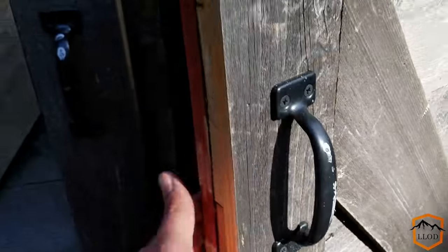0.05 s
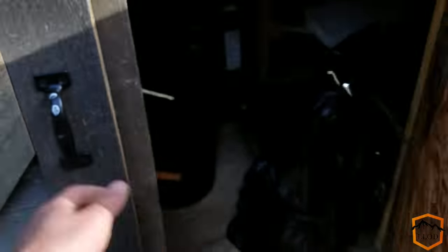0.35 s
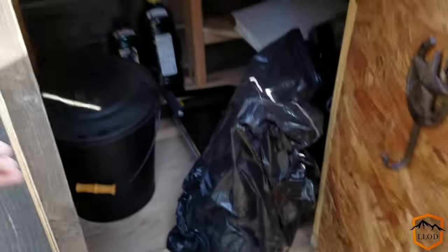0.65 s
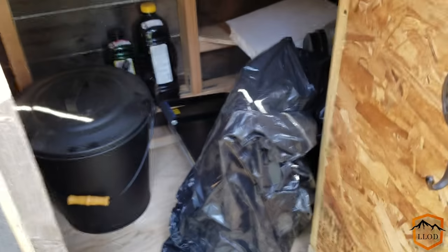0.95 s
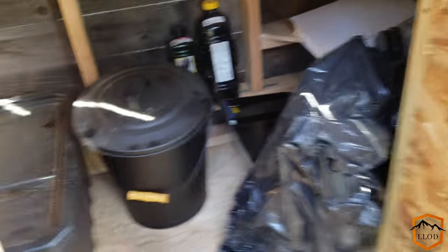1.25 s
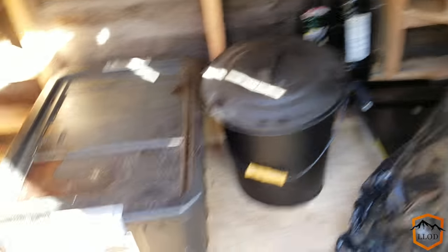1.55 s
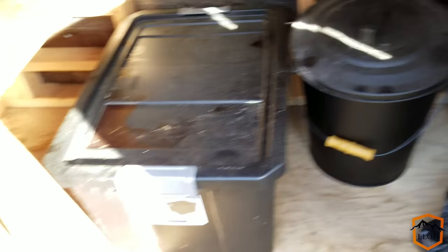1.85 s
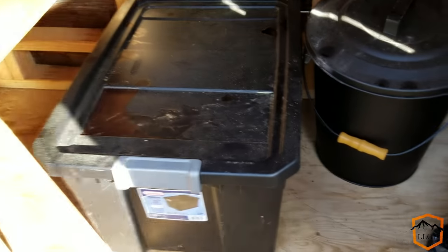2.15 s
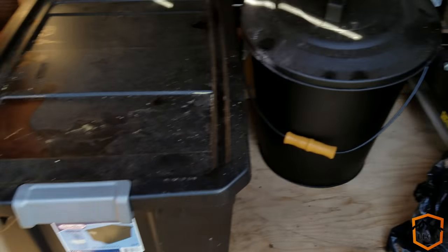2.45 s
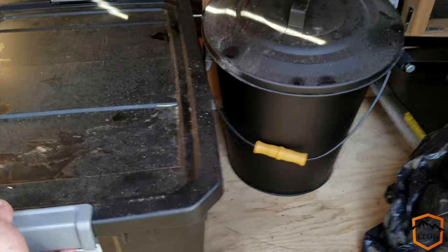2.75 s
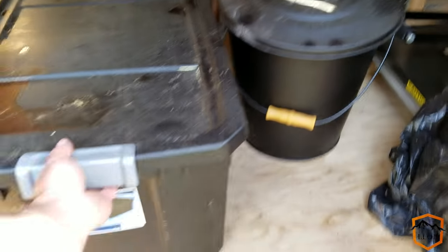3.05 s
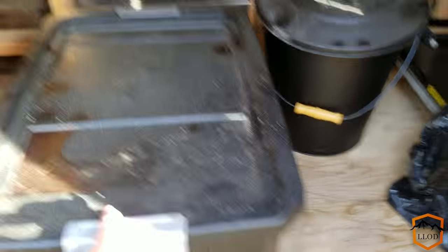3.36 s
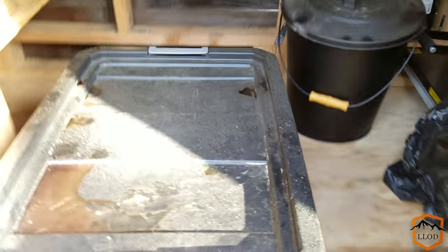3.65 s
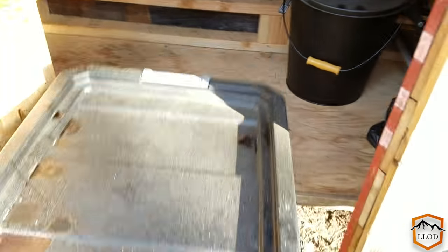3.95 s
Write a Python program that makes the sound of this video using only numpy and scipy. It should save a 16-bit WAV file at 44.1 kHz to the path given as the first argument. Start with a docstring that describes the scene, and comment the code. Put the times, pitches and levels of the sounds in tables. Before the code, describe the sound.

A wooden door squeals and creaks open, then a plastic tub thumps and drags.

```python
"""A wooden shed door swings open on a dry hinge, close to a single microphone. The hinge sticks and
slips: it squeals high, stops, then slides down into a rough creak while the boards rub and rattle.
Inside the small shed come heavy thumps on the hollow floor and a few knocks, then a plastic tub is
dragged over the gritty plywood, droning and scraping, and bumps to rest.
The board walls give short reflections, and faint outdoor air lies behind it all."""
import sys
import numpy as np
from scipy import signal
from scipy.fft import rfft, irfft
from scipy.io import wavfile

SR = 44100
rng = np.random.default_rng(int(sys.argv[2]) if len(sys.argv) > 2 else 0)


def output_pcm(signal):
    """Save a mono or channel-first signal as 16-bit PCM at the path in sys.argv[1].

    Samples are clipped to [-1, 1] before scaling.
    """
    pcm = np.clip(np.atleast_2d(signal).T, -1, 1) * 32767
    wavfile.write(sys.argv[1], SR, np.round(pcm).astype(np.int16))


N = 176400
TIME = np.arange(N) / SR
CUTOFF_HZ = 15750

# Spectrum of the air outside: frequency_hz, gain_db
AIR_SPECTRUM = [(40, -22), (260, -3), (650, 0), (1000, -8), (3000, -24), (12000, -35)]

# Small bright ticks: start_s, level_db
TICK_HITS = [(0.473, -55.5), (2.721, -47)]
# Knocks and scuffs on wood and plastic: start_s, bass_db, middle_db, presence_db, treble_db, rise_s, t60_s
KNOCK_HITS = [(0.053, -28, -26, -61, -51, 0.00015, 0.048), (0.151, -45, -25, -37, -40.5, 0.0074, 0.096),
              (0.195, -46.5, -33, -38, -52, 0.0015, 0.087), (0.472, -75, -40.5, -77, -64, 0.0012, 0.14),
              (.499, -66, -31.5, -72, -70, 0.00094, 0.039), (.621, -41, -21.5, -55, -60, 0.00093, 0.0091),
              (.809, -62, -39, -48, -38, 0.00068, 0.033), (.873, -54, -20, -38, -37, 0.00033, 0.062),
              (0.918, -48, -22, -28, -28.5, 0.0012, 0.063), (.936, -32, -24.5, -60, -60, 0.00096, 0.16),
              (1.025, -33.5, -24, -28, -36.5, 0.001, 0.093), (1.073, -41, -22, -40, -34, 0.00037, 0.042),
              (1.505, -26, -15.5, -25, -27, 0.0023, 0.057), (1.791, -46, -31.5, -33, -47, 0.0071, 0.26),
              (1.939, -42, -26, -51, -48, 0.00404, 0.073), (2.258, -31, -17.5, -29, -33, 0.011, 0.27),
              (2.522, -68, -26, -19.5, -28, 0.00038, 0.011), (2.626, -12, -12.5, -20.5, -31, 0.0007, 0.093),
              (2.755, -23.5, -18.5, -34, -46.5, 0.00093, 0.28),
              (2.805, -24.5, -20.5, -30, -52, 0.0079, 0.11),
              (2.927, -26, -26.5, -39.5, -48.5, 0.0015, 0.19)]
# Edges of those four bands: frequency_hz
KNOCK_EDGES_HZ = [110, 330, 1200, 3500, 12000]
# Thumps, given for the floor's lowest mode: start_s, level_db, pitch_hz, t60_s
THUMP_HITS = [(2.015, -15, 292, 0.12), (2.455, -30, 79, 0.14), (2.642, -2.5, 177, 0.086),
              (2.676, -8, 154.6, 0.14), (2.882, -21.5, 175, 0.14), (3.956, -4.5, 279.2, 0.45)]
# Modes of the hollow floor: pitch_ratio, gain_db
FLOOR_RESONANCES = [(1, 0), (1.52, -7), (2.3, -16)]

# The tub is shifted slightly, then dragged: time_s, drone_db, scrape_db, grit_db
DRAG_LEVELS = [(2.64, -59, -33.5, -53), (3.022, -44, -53, -60), (3.036, -21.5, -20, -38),
               (3.1, -8, -15, -36), (3.21, -15.5, -14.5, -39), (3.36, -17.5, -13, -37),
               (3.712, -24.5, -14.5, -36.5), (3.728, -48, -17, -21), (3.76, -19, -13, -32.5),
               (3.86, -29.5, -18.5, -30), (3.945, -16.5, -18, -25.5), (3.99, -11, -36.5, -59)]
# Ringing of the tub's walls: pitch_hz, gain_db, t60_s
TUB_RESONANCES = [(242, 3.5, .12), (381, 4.5, 0.14), (513, 0.5, 0.11), (879, -5, 0.16)]
# Spectra of the tub's drone, its scrape and the grit under it: frequency_hz, gain_db
DRONE_SPECTRUM = [(55, -20.5), (110, -7.5), (165, -1.5), (260, 3.5), (450, -0.5)]
SCRAPE_SPECTRUM = [(220, -23), (320, -3.5), (1000, -2.5), (1400, -6), (2000, -14), (2900, -20)]
GRIT_SPECTRUM = [(2900, -0.5), (4200, 1), (6000, -7.5), (8300, -14.5), (10700, -38.5), (13000, -24.5),
                 (15500, -41)]
# A close reflection of the grit, later as the tub moves away from the microphone: time_s, delay_s
GRIT_REFLECTION = [(3.1, .0002), (3.65, .0003)]

# Rubbing of the door boards, and the panel's boom while the hinge binds hardest: time_s, level_db
RUB_LEVELS = [(.77, -54.5), (.86, -35.5), (1.03, -35), (1.2, -24.5), (1.29, -19), (1.62, -23), (1.68, -31),
              (1.73, -49), (1.78, -46.5), (1.82, -26), (1.91, -60.5), (2.04, -26.5), (2.14, -43.5),
              (2.33, -34.5), (2.62, -42.5)]
BOOM_LEVELS = [(1.23, -40), (1.29, -18.5), (1.4, -37), (1.55, -38)]
# Spectrum of the rubbing: frequency_hz, gain_db
RUB_SPECTRUM = [(50, -14), (150, -8), (235, -3), (420, 0), (800, -4.5), (1500, -9), (4000, -22.5),
                (6000, -24.5)]
# Ringing of the door's planks and of the hinge leaf: pitch_hz, gain_db, t60_s
PLANK_RESONANCES = [(491, -6.5, 0.083), (599, 3.5, 0.2), (1080, 1, 0.053)]
LEAF_RESONANCES = [(4760, 1, .09), (5500, -1, .2)]

# The hinge's pin hiss, first whistle, squeal, creak and singing leaf: time_s, level_db
PIN_LEVELS = [(.5, -71), (.55, -54.5), (.7, -47.5), (.735, -72), (.8, -61), (.87, -42), (.99, -52),
              (1.5, -35.5), (1.66, -41), (1.73, -68), (1.78, -65), (1.83, -38.5), (2.32, -38), (2.6, -90)]
WHISTLE_LEVELS = [(0, -36.5), (.018, -55.5), (.08, -47.5), (.14, -43.5), (.155, -68)]
SQUEAL_LEVELS = [(1.165, -50), (1.18, -35.5), (1.24, -44), (1.29, -33), (1.37, -28), (1.42, -31),
                 (1.46, -25), (1.58, -21.5), (1.685, -29), (1.705, -54)]
CREAK_LEVELS = [(1.81, -44), (1.83, -25), (1.9, -33.5), (2.03, -35.5), (2.12, -38.5), (2.33, -38.5),
                (2.42, -43), (2.57, -49), (2.61, -73)]
SING_LEVELS = [(2.45, -40), (2.57, -46.5), (2.675, -46)]
# Spectra of the pin's hiss and of the squeal's and creak's partials: frequency_hz, gain_db
PIN_SPECTRUM = [(3000, -4.5), (5000, -6.5), (7000, 8), (9500, -10.5), (12500, -11.5), (15500, -16)]
SQUEAL_SPECTRUM = [(4700, -8.5), (6500, 8), (9800, -9.5), (13000, 1.5), (15000, -22)]
CREAK_SPECTRUM = [(1100, 5.5), (2400, -2.5), (3600, -5.5), (5000, -0.5), (7000, -6), (11500, -11),
                  (13800, -8.5), (15500, -22)]
# How often the hinge slips in the squeal and the creak: time_s, pitch_hz
SQUEAL_SLIP_RATE = [(1.18, 4500), (1.2, 5080), (1.21, 4250), (1.222, 5400), (1.24, 5400), (1.244, 6370),
                    (1.295, 6370), (1.358, 6950), (1.372, 6500), (1.42, 6150), (1.456, 5010), (1.5, 4990),
                    (1.556, 4700), (1.675, 4950), (1.695, 5650)]
CREAK_SLIP_RATE = [(1.825, 3780), (1.875, 3220), (1.895, 2840), (1.95, 2430), (1.967, 2370), (1.97, 1860),
                   (2.03, 1340), (2.1, 1210), (2.3, 1245), (2.395, 1275), (2.46, 1170), (2.52, 1110),
                   (2.59, 1060)]
# Unsteadiness of that slipping: time_s, share_of_slip_rate
SQUEAL_JITTER = [(1.235, .04), (1.25, .004), (1.32, .011), (1.405, .01), (1.43, .05), (1.452, .05),
                 (1.46, .003), (1.56, .007)]
CREAK_JITTER = [(1.94, .009), (2.02, .025), (2.18, .014), (2.32, .022), (2.42, .013)]


def from_db(db):
    """Decibels to gain."""
    return 10 ** (np.asarray(db) / 20)


def rms_one(x):
    """Scale to unit rms."""
    return x / np.sqrt(np.mean(x ** 2) + 1e-20)


def curve(rows, column=1):
    """Join a table's rows by straight lines in time."""
    rows = np.array(rows)
    return np.interp(TIME, rows[:, 0], rows[:, column])


def envelope(rows, column=1):
    """Gain from a dB column, fading fast outside its span."""
    outside_s = np.maximum(rows[0][0] - TIME, 0) + np.maximum(TIME - rows[-1][0], 0)
    return from_db(curve(rows, column) - np.minimum(800 * outside_s, 100))


def gain_at(spectrum, hz):
    """Gain of a spectrum, falling 24 dB an octave beyond its ends."""
    points_hz, db = np.transpose(spectrum)
    octaves_out = np.maximum(0, np.log2(points_hz[0] / hz)) + np.maximum(0, np.log2(hz / points_hz[-1]))
    return from_db(np.interp(np.log(hz), np.log(points_hz), db) - 24 * octaves_out)


def coloured(x, spectrum):
    """Give an excitation a spectrum, at unit rms."""
    hz = np.arange(1, N + 2) * SR / (2 * N)
    return rms_one(irfft(rfft(x, 2 * N) * gain_at(spectrum, hz))[:N])


def band(x, low_hz, high_hz):
    """Causal band-pass."""
    return signal.sosfilt(signal.butter(3, [low_hz, high_hz], "band", fs=SR, output="sos"), x)


def lowpass(x, hz):
    """Gentle treble roll-off."""
    return signal.sosfilt(signal.butter(2, hz, fs=SR, output="sos"), x)


def ring(x, hz, t60_s):
    """One resonance, with gain 1 at its top."""
    r = from_db(-60 / (t60_s * SR))
    poles = [1, -2 * r * np.cos(2 * np.pi * hz / SR), r * r]
    return signal.lfilter(np.array([1, 0, -1]) * (1 - r * r) / 2, poles, x)


def body(x, modes):
    """A body passes the vibration on and rings at its modes."""
    return x + sum(from_db(db) * ring(x, hz, t60_s) for hz, db, t60_s in modes)


def drift(rate_hz):
    """Smooth random wander at unit rms."""
    r = np.exp(-2 * np.pi * rate_hz / SR)
    return rms_one(signal.lfilter([1], [1, -2 * r, r * r], rng.standard_normal(N + SR))[SR:])


def slips(per_s, spread_db):
    """Random tiny slips of uneven size."""
    sizes = from_db(spread_db * np.minimum(rng.exponential(1, N), 4)) * rng.choice([-1, 1], N)
    return sizes * (rng.random(N) < per_s / SR)


def shed(x, room_db, low_t60_s=.3, treble_t60_s=.09):
    """Dense reflections off the board walls reach the microphone from 3 ms on; the treble dies first."""
    t = TIME[:SR // 2]
    noise = rng.standard_normal(len(t))
    low = lowpass(noise, 2360)
    tail = low * from_db(-60 * t / low_t60_s) + (noise - low) * from_db(-60 * t / treble_t60_s)
    tail *= t > .003
    return x + from_db(room_db) * signal.fftconvolve(x, tail / np.linalg.norm(tail))[:N]


def outdoor_air():
    """Faint, steady air beyond the shed."""
    return from_db(-52.5) * coloured(rng.standard_normal(N), AIR_SPECTRUM)


def ticks(t60_s=.18):
    """Light, hard contacts leave a short sizzle high in the treble."""
    shape = sum((TIME > s) * from_db(db - 60 * np.maximum(TIME - s, 0) / t60_s) for s, db in TICK_HITS)
    return shape * rms_one(band(rng.standard_normal(N), 10600, 14300))


def knocks(crack=4.4, t60_stretch=(1.94, 1, 1, 1)):
    """Each knock is a crack followed by a crowd of short-lived panel modes; the bass rings longest."""
    out, t = np.zeros(N + SR), TIME[:SR // 2]
    for start_s, *levels_db, rise_s, t60_s in KNOCK_HITS:
        start = int(start_s * SR)
        for db, low_hz, high_hz, stretch in zip(levels_db, KNOCK_EDGES_HZ, KNOCK_EDGES_HZ[1:], t60_stretch):
            decay = from_db(-60 * np.maximum(t - rise_s, 0) / (t60_s * stretch))
            shape = np.minimum(t / rise_s, 1) * decay
            force = shape * rng.standard_normal(len(t)) + 1e-18
            force[int(rise_s * SR)] += crack
            burst = band(band(force, low_hz, high_hz), low_hz / 2, high_hz)
            burst *= np.linalg.norm(shape) / np.linalg.norm(burst)
            out[start:start + len(t)] += from_db(db) * burst
    return lowpass(out[:N], 6500)


def thumps(contact_s=.0018):
    """Soft, heavy contacts set the hollow floor booming; its higher modes die sooner."""
    out = np.zeros(N)
    for start_s, db, hz, t60_s in THUMP_HITS:
        t = np.maximum(TIME - start_s, 0)
        attack = 1 - np.exp(-t / contact_s)
        for ratio, mode_db in FLOOR_RESONANCES:
            decay = from_db(db + mode_db - 60 * t * ratio / t60_s)
            out += attack * decay * np.sin(2 * np.pi * hz * ratio * t)
    return out


def grit(t60_cycles=40, surge_db=2.2):
    """Grains crack under the tub in surges, each ringing briefly; a close reflection hollows the sound."""
    grains = sum(ring(slips(per_s=260, spread_db=3) + 1e-18, hz, t60_cycles / hz)
                 for hz in np.geomspace(2600, CUTOFF_HZ, 32))
    grains *= from_db(surge_db * drift(18))
    reflection = np.interp(TIME - curve(GRIT_REFLECTION), TIME, grains)
    return grains - .4 * reflection


def tub_drag():
    """The tub chatters over the floor: its hollow body drones, its base scrapes, grit crackles."""
    chatter = from_db(.79 * drift(28))
    catches = shed(slips(per_s=2200, spread_db=.5), room_db=-11) * chatter
    walls = body(slips(per_s=980, spread_db=3.5), TUB_RESONANCES)
    drone = envelope(DRAG_LEVELS, column=1) * coloured(walls, DRONE_SPECTRUM)
    scrape = envelope(DRAG_LEVELS, column=2) * coloured(body(catches, TUB_RESONANCES), SCRAPE_SPECTRUM)
    crackle = envelope(DRAG_LEVELS, column=3) * coloured(grit() * chatter, GRIT_SPECTRUM)
    return drone + scrape + crackle


def door_boards(boom_hz=254, boom_t60_s=.027):
    """Dense slips shake the planks as the door turns, and the panel booms at its lowest mode."""
    shake = shed(slips(per_s=1800, spread_db=1), room_db=-6)
    rub = coloured(body(shake, PLANK_RESONANCES), RUB_SPECTRUM)
    boom = rms_one(ring(ring(shake, boom_hz, boom_t60_s), boom_hz, boom_t60_s / 2))
    return envelope(RUB_LEVELS) * rub + envelope(BOOM_LEVELS) * boom


def stick_slip(hz, spectrum, jitter, jitter_hz, flutter_db, dull_db=0):
    """Harmonics of a jittering slip rate, each fluttering in strength."""
    cycles = np.cumsum(hz * (1 + jitter * drift(jitter_hz))) / SR
    cycles += .3 * jitter * drift(700)  # single slips come early or late
    out = np.zeros(N)
    for k in range(1, 15):
        gain = gain_at(spectrum, k * hz) * (k * hz < CUTOFF_HZ)
        gain *= from_db(flutter_db * drift(90) - (k - 1.5) * dull_db)
        out += gain * np.sin(2 * np.pi * k * cycles)
    return np.sqrt(2) * out


def hinge_whistle(pitch_hz=4554):
    """The hinge first gives a brief, thin, almost steady tone."""
    cycles = np.cumsum(pitch_hz * (1 + .001 * drift(60))) / SR
    return envelope(WHISTLE_LEVELS) * np.sqrt(2) * np.sin(2 * np.pi * cycles)


def hinge_squeal(catch_s=1.243):
    """Fast slipping makes a high, scratchy squeal, dull until the hinge catches."""
    tone = stick_slip(curve(SQUEAL_SLIP_RATE), SQUEAL_SPECTRUM, curve(SQUEAL_JITTER),
                      jitter_hz=200, flutter_db=3.5, dull_db=12 * (TIME < catch_s))
    return envelope(SQUEAL_LEVELS) * tone


def hinge_creak(judder_at_s=2.205, judder_hz=24.6, stutter_from_s=2.44, stutter_hz=20.4):
    """The slip rate falls into a creak that judders, then breaks up as the door slows."""
    t = TIME - judder_at_s
    judder = .027 * np.exp(-(t / .14) ** 2) * np.cos(2 * np.pi * judder_hz * t)
    stutter = .66 * np.sin(2 * np.pi * stutter_hz * np.maximum(TIME - stutter_from_s, 0))
    slip_hz = curve(CREAK_SLIP_RATE) * (1 + judder - .025 * stutter)
    tone = stick_slip(slip_hz, CREAK_SPECTRUM, curve(CREAK_JITTER), jitter_hz=120, flutter_db=4.2)
    rasp = 1 + from_db(-15) * drift(500)  # noise released by the slips
    return envelope(CREAK_LEVELS) * (1 - stutter) * tone * rasp


def hinge():
    """Friction rings the hinge leaf, which sings on as the door comes to rest; the dry pin hisses."""
    friction = hinge_whistle() + hinge_squeal() + hinge_creak()
    leaf_hz = LEAF_RESONANCES[0][0]
    sing = envelope(SING_LEVELS) * rms_one(ring(rng.standard_normal(N), leaf_hz, t60_s=.011))
    hiss = envelope(PIN_LEVELS) * coloured(slips(per_s=3000, spread_db=1), PIN_SPECTRUM)
    return shed(body(friction, LEAF_RESONANCES), room_db=-4) + sing + hiss


def scene():
    """Door, tub and impacts in the shed, over faint outdoor air, in mono."""
    air = outdoor_air()
    door = hinge() + door_boards()
    tub = tub_drag()
    impacts = shed(knocks() + ticks() + thumps(), room_db=-14.5)
    return (air + impacts + tub + door)[None]


def record(dry, ceiling=.95):
    """After the microphone, the highest peaks are rounded and the top treble is cut."""
    rounded = dry / (1 + (dry / ceiling) ** 6) ** (1 / 6)
    return signal.sosfilt(signal.ellip(10, .1, 80, CUTOFF_HZ, fs=SR, output="sos"), rounded)


dry = scene()
out = record(dry)
output_pcm(out)
```